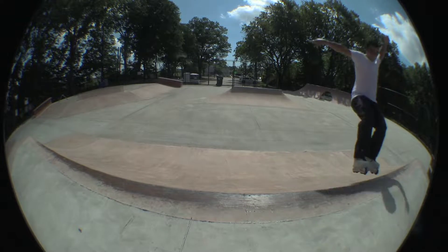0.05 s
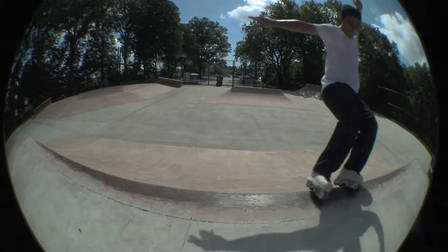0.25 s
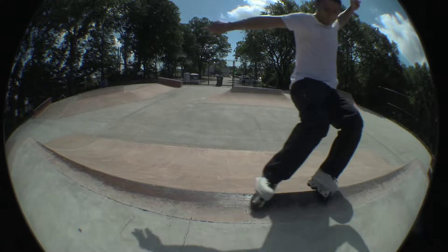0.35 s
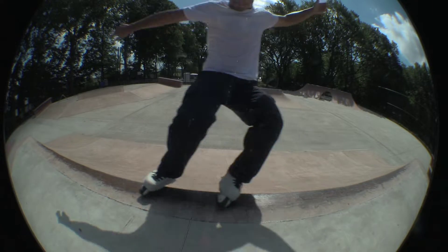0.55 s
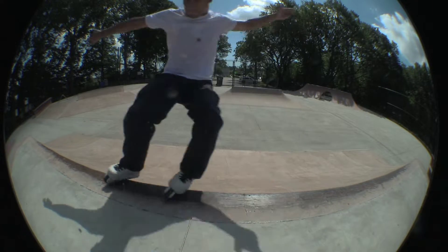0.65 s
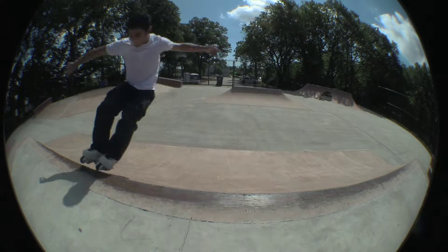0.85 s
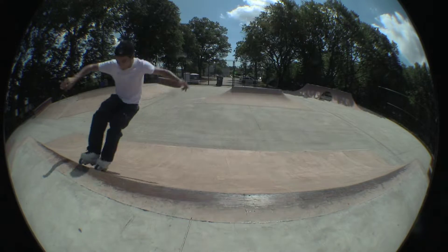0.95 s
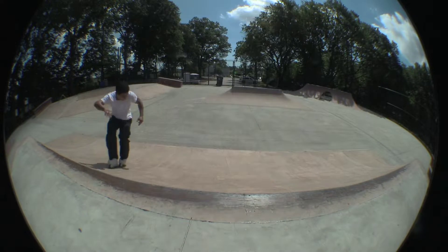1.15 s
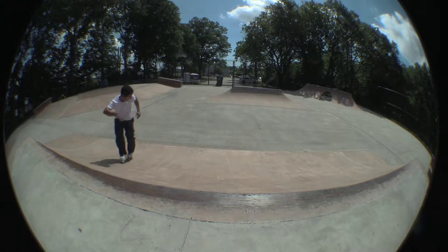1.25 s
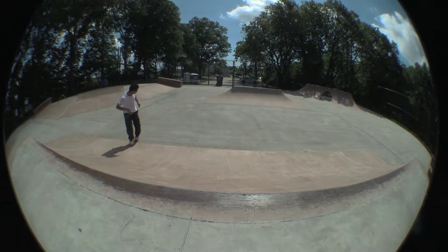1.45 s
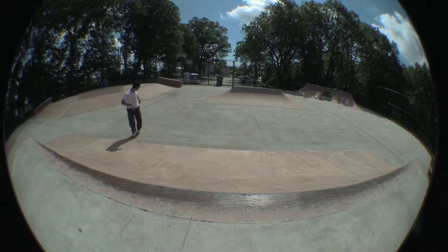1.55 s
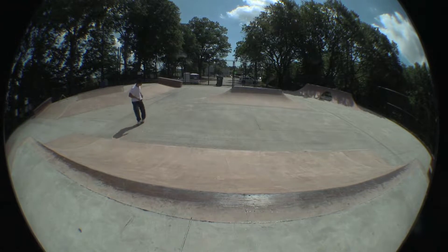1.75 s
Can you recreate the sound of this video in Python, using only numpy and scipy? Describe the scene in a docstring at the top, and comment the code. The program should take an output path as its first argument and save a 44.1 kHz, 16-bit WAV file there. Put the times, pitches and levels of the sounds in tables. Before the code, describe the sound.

A rough inline skate grind passes close by, right to left, plastic boots clacking and rasping on a concrete ledge outdoors. A thudding landing follows, then hard wheels roll off under a short rumble of wind on the microphone.

```python
"""In an open park, an inline skater hops onto a concrete ledge and grinds along it from right to left.
The plastic boots knock on, stick and slip over the grit close to the microphone, and drop off with a
thump after a faint squeak. Hard wheels roar and drone, rolling away over a joint in the concrete.
The air stirred by the skater buffets the microphone; the park adds a faint wash and hardly any echo."""
import sys
import numpy as np
from scipy import signal
from scipy.io import wavfile
from scipy.ndimage import uniform_filter1d, minimum_filter1d, map_coordinates

SR = 44100
rng = np.random.default_rng(int(sys.argv[2]) if len(sys.argv) > 2 else 0)


def to_wav(s):
    """Save 16-bit WAV."""
    ch = np.atleast_2d(s).T  # columns
    pcm = np.round(np.clip(ch, -1, 1) * 32767)  # PCM
    wavfile.write(sys.argv[1], SR, pcm.astype(np.int16))


N = 79380
T = np.arange(N) / SR

# Tone of the grind's low rumble, hollow middle and sharp grit: f/Hz, level/dB
RUMBLE_TONE = [(40, -59), (90, -19.5), (140, -4), (205, 4), (280, -0.5), (370, -7.5), (600, -49),
               (1500, -66)]
HOLLOW_TONE = [(150, -45.5), (300, -11), (400, 2.5), (540, 0.5), (690, 5.5), (880, -3.5), (1300, -28),
               (3000, -51)]
GRIT_TONE = [(1500, -32.5), (3200, -4.5), (4200, 9), (5500, 4.5), (7500, -2), (9300, -2.5), (11500, -10),
             (14500, -18), (16000, -30)]
# How loud each part of the grind is: t/s, rumble/dB, hollow/dB, rasp/dB, grit/dB
GRIND_LEVELS = [(.24, -19.5, -41, -62, -53), (.258, -21, -23.5, -32, -32), (.275, -8.5, -25, -13, -25),
                (.312, -36.5, -27.5, -22.5, -35), (.345, -14, -37, -20.5, -35),
                (.368, -28.5, -27.5, -22.5, -36), (.402, -17.5, -26.5, -26.5, -37),
                (.415, -23, -25.5, -17.5, -31.5), (.50, -18.5, -21.5, -19, -35.5),
                (.548, -17, -22.5, -13, -31), (.57, -26.5, -25.5, -17.5, -38), (.595, -27, -22, -18, -36.5),
                (.615, -22.5, -22.5, -16.5, -35), (.665, -28.5, -18, -16, -36),
                (.70, -16.5, -15.5, -15, -34), (.74, -28.5, -20, -20, -38), (.80, -20, -25, -25.5, -39),
                (.828, -19, -19, -19, -38), (.86, -25, -23, -20, -37), (.897, -63, -22, -20.5, -33.5),
                (.912, -27, -52, -46, -62)]


def grind(chatter_hz=135, chatter_db=2, fade_s=0.0072):
    """The soles stick and slip along the ledge; this one chatter drives all four parts of the sound."""
    slips = unit(filtered(noise(), 2, chatter_hz))
    chatter = grains(spread_db=3) * amp(chatter_db * slips)
    surge = amp(catches_db())
    start, end = GRIND_LEVELS[0][0], GRIND_LEVELS[-1][0]
    contact = np.clip(np.minimum(T - start, end - T) / fade_s + 1, 0, 1)
    parts = [colour(chatter, RUMBLE_TONE), colour(chatter, HOLLOW_TONE),
             boot(chatter), colour(chatter, GRIT_TONE)]
    rumble, hollow, rasp, grit = [steady(part) * amp(curve(GRIND_LEVELS, column))
                                  for column, part in enumerate(parts, 1)]
    return contact * ((rumble + hollow) * surge ** 0.25 + (rasp + grit) * surge)


# Rough spots on the ledge: t/s, boost of rasp and grit/dB
ROUGH_SPOTS = [(.4625, 4.5), (0.4717, 5), (0.477, 5.5), (0.5118, 4), (.532, 3.5), (0.5516, 4), (.577, 2.5),
               (0.6057, 19), (0.6262, 5), (.6415, 3), (0.6491, 14), (.6615, 7), (0.692, 10), (0.7242, 10.5),
               (0.751, 6.5), (0.784, 11), (.819, 14), (.8385, 6), (.867, 2.5)]


def catches_db(grip_s=0.0017, release_s=0.0031):
    """The sole grips each rough spot at once and lets go more slowly, so the grind surges."""
    boost_db = 0
    for s, db in ROUGH_SPOTS:
        before, after = np.maximum(s + grip_s - T, 0), np.maximum(T - s - grip_s, 0)
        boost_db += db * np.exp(-before / grip_s - (after / release_s) ** 2 / 2)
    return boost_db


# Notes the boot rings at: f/Hz, level/dB, time to fade by 60 dB/s
BOOT_NOTES = [(1122, -8, 0.031), (1260, -30, 0.064), (1370, -5, 0.093), (1512, -9, 0.027),
              (1950, -37, 0.082), (1980, -20, 0.083), (2396, -8, 0.031)]
# Tone of the boot's rasp: f/Hz, level/dB
RASP_TONE = [(400, -35), (850, -6), (1130, -1), (1500, -0.5), (1950, -3), (2500, -7), (3100, -12),
             (4200, -18.5), (6000, -61.5), (16000, -112)]
# The rasp is brightest when the soles face the microphone: t/s, treble level/dB
BOOT_TREBLE = [(.22, 13), (.297, -5), (.335, 0), (.47, 4.5), (.57, -5), (.63, -1.5), (.69, -3.5),
               (.76, -1.5), (.83, 1.5), (.89, -9.5), (1.05, -0.5), (1.55, -3)]


def boot(shaking, treble_hz=1960):
    """The shaken plastic boot rings briefly; its treble depends on which way it faces."""
    t = T[:SR // 8]
    ring = sum(amp(db - 60 * t / fade_s) * np.cos(2 * np.pi * hz * t) * 4 * np.log(1000) / (fade_s * SR)
               for hz, db, fade_s in BOOT_NOTES)
    rasp = colour(shaking + signal.fftconvolve(shaking, ring)[:N], RASP_TONE)
    dull = below(rasp, treble_hz)
    return dull + (rasp - dull) * amp(curve(BOOT_TREBLE))


# Notes the wheel frame rings at when hit: f/Hz, level/dB, decay/s
FRAME_NOTES = [(399, 2.5, 0.0047), (770, -1.5, 0.0039)]
# Blows on boots and wheels: t/s, thump f/Hz, thump/dB, hollow knock/dB, clack/dB, grit/dB
BLOWS = [(.224, 152, -5.5, -28.5, -23.5, -30.5), (0.2366, 165, -26, -37, -12, -21),
         (0.2588, 162, -13, -18, -13.5, -21), (0.265, 174, -4.5, -26, -15, -39),
         (.295, 203, -23, -28, -12, -24), (.3315, 194, -4, -18.5, -26, -36),
         (.409, 230, -11.5, -21.5, -10, -40), (.898, 265, -11.5, -33, -11.5, -37),
         (0.9169, 200, -37, -25.5, -17, -28.5), (0.9203, 194, -9, -26, -23.5, -51),
         (1.0094, 192, -17, -29, -22.5, -35), (1.022, 217, -22, -28, -27, -35),
         (1.039, 218, -0.5, -14, -17, -30), (1.0496, 240, -4, -21.5, -15.5, -32),
         (1.07, 275, -2, -7.5, -18, -30), (1.5459, 333, -23, -36.5, -23, -37),
         (1.5908, 293, -20.5, -27, -25, -42), (1.603, 330, -12.5, -32, -24.5, -49)]


def knocks(overtone_ratio=1.88):
    """Each blow makes the skate thump, with a hollow knock, a plastic clack and a spit of grit."""
    thumps, cracks = np.zeros((2, N))
    for s, hz, thump_db, hollow_db, clack_db, grit_db in BLOWS:
        t = np.maximum(T - s, 0)
        rise = 1 - np.exp(-t / 0.0014)
        low = fading_note(t, hz, decay_s=0.0029)
        overtone = amp(-6) * fading_note(t, hz * overtone_ratio, decay_s=0.0017)
        thumps += 2 * amp(thump_db) * rise * (low + overtone)
        frame = sum(amp(db) * fading_note(t, note_hz, decay_s) for note_hz, db, decay_s in FRAME_NOTES)
        thumps += amp(hollow_db) * (burst(colour(noise(), HOLLOW_TONE), s, decay_s=0.0051) + frame)
        cracks += amp(clack_db) * burst(boot(noise()), s, decay_s=0.0059)
        cracks += amp(grit_db) * burst(colour(noise(), GRIT_TONE), s, decay_s=0.0076)
    return filtered(thumps, order=3, hz=111, kind="high") + cracks


# How loud the rolling wheels are: t/s, drone/dB, roar/dB
WHEEL_LEVELS = [(0, -41, -40), (.09, -40, -40), (.2, -41.5, -39), (.5, -44, -24), (.93, -35.5, -42),
                (.985, -39.5, -38.5), (1.09, -28.5, -35.5), (1.17, -38.5, -34), (1.27, -32, -33.5),
                (1.41, -38.5, -32.5), (1.535, -41.5, -37), (1.562, -36, -29), (1.6, -29, -37),
                (1.63, -37, -36.5), (1.71, -43.5, -40.5), (1.8, -50.5, -40)]
# Tone of the wheels' roar: f/Hz, level/dB
ROAR_TONE = [(200, -49.5), (450, -5.5), (750, -3.5), (950, -3.5), (1350, -0.5), (1750, -4.5), (2400, -6),
             (3200, -14), (4500, -31), (6200, -27), (9500, -44), (13000, -44), (15500, -77)]


def wheel_roar():
    """Hard wheels rattle over fine concrete, sounding duller before the first knock."""
    bright = colour(grains(spread_db=4), ROAR_TONE)
    dull = filtered(bright, order=1, hz=1800)
    return steady(np.where(T < BLOWS[0][0], dull, bright)) * amp(curve(WHEEL_LEVELS, 2))


# Tone of the wheels' drone: f/Hz, level/dB
DRONE_TONE = [(20, -45), (70, -8.5), (130, -4), (210, 2.5), (350, -1), (550, -10), (1200, -42)]


def wheel_drone():
    """The rolling wheels and their frames give a low hum."""
    return steady(colour(grains(spread_db=4), DRONE_TONE)) * amp(curve(WHEEL_LEVELS, 1))


def squeak(start_s=0.981, length_s=0.026, top_hz=3460, bend=0.06):
    """A faint squeak in mid-air rises and falls in pitch, along with a note an octave higher."""
    arch = np.sin(np.pi * np.clip((T - start_s) / length_s, 0, 1))
    phase = 2 * np.pi * np.cumsum(top_hz * (1 - bend * (1 - arch) ** 2)) / SR
    return arch * (amp(-51) * np.sin(phase) + amp(-50) * np.sin(2 * phase))


# Where the skater is heard: t/s, head start on the left/ms, left minus right in the midrange/dB
SKATER_PATH = [(0, -0.18, -6.5), (.27, -0.18, -9.5), (.4, -.11, -2), (.5, -0.058, -4.5), (.6, -0.041, -1),
               (.7, 0.063, 1.5), (.8, .11, 2), (.9, .135, 4), (1.07, 0.2, 6), (1.3, 0.085, 5.5),
               (1.6, 0.11, -2.5), (1.8, 0.011, -3)]


def pass_by(sound, bass_hz=750, treble_hz=6170, bass_balance_db=-1.4):
    """The nearer side hears the skater sooner and louder; the bass stays a little to the right."""
    lead_samples = curve(SKATER_PATH, 1) * SR / 1000
    balance_db = curve(SKATER_PATH, 2)
    bass = below(sound, bass_hz)
    body = below(below(sound, treble_hz), treble_hz)
    channels = []
    for side in (0.5, -0.5):  # left, right
        shaded = bass * amp(side * bass_balance_db) + (body - bass) * amp(side * balance_db)
        shifted = map_coordinates(shaded, [np.arange(N) + side * lead_samples], order=5)
        treble = (sound - body) * amp(side * balance_db / 2)  # stays nearer the centre
        channels.append(shifted + treble)
    return np.array(channels)


# Tone of wind on the microphone: f/Hz, level/dB
WIND_TONE = [(15, -14), (35, -23), (62, -8), (105, 0), (170, 0), (300, -46), (900, -76)]
# Strength of the swirling air, and of single puffs: t/s, level/dB
SWIRL_LEVELS = [(0, -49), (.09, -40), (.2, -50), (.3, -51), (1.12, -49), (1.165, -29), (1.2, -28.5),
                (1.24, -27.5), (1.3, -26.5), (1.34, -34), (1.39, -22), (1.45, -33), (1.49, -76), (1.8, -88)]
PUFFS = [(1.198, -38), (1.385, -14), (1.395, -14), (1.4039, -16.5), (1.4346, -20)]


def skater_wind(left_db=-4, right_db=2, puff_s=0.00149):
    """Swirls of air hit each side of the microphone, the right one harder, with a few sharp puffs."""
    swirls = np.array([steady(colour(noise(), WIND_TONE)) for _ in range(2)]) * amp(curve(SWIRL_LEVELS))
    puffs = np.zeros(N)
    for s, db in PUFFS:
        offset = (T - s) / puff_s
        puffs += amp(db) * (1 - offset ** 2) * np.exp(-offset ** 2 / 2)
    return (swirls + puffs) * amp([[left_db], [right_db]])


# Tone of sound bouncing off nearby concrete: f/Hz, level/dB
BOUNCE_TONE = [(100, -21), (500, -16.5), (1400, -11.5), (2800, -8.5), (4500, -5), (7000, -4.5),
               (15000, -14)]


def ground_bounces(sound, change_s=0.045, decay_s=0.0034):
    """Sound bounces off the ground and ledge in a pattern that keeps changing as the skater moves."""
    t, hop = T[:SR // 32], int(change_s * SR)
    padded = np.pad(sound, (hop, 2 * hop))
    bounced = np.zeros(N + 3 * hop + len(t))
    for at in range(0, N + hop, hop):
        echoes = rng.standard_normal(len(t)) * np.exp(-t / decay_s)
        piece = padded[at:at + 2 * hop] * signal.windows.cosine(2 * hop)
        echoed = signal.fftconvolve(piece, echoes / np.linalg.norm(echoes))
        bounced[at:at + len(echoed)] += echoed
    return signal.fftconvolve(bounced[hop:], response(BOUNCE_TONE))[:N]


# How long the park's echo lasts: f/Hz, time to fade by 60 dB/s
ECHO_TIMES = [(100, 0.054), (1500, .3), (5000, 0.23), (15000, 0.13)]


def park_echo(sound, tail_db=-30.5):
    """The open park returns the nearby bounces, then only a thin tail of echo."""
    hz, t, spectrum = signal.stft(rng.standard_normal(SR // 2), SR, nperseg=256)
    fade = amp(-60 * t / read(ECHO_TIMES, hz)[:, None])
    tail = signal.istft(spectrum * fade, SR)[1]
    tail *= amp(tail_db) / np.linalg.norm(tail)
    return ground_bounces(sound) + signal.fftconvolve(sound, tail)[:N]


# Tone of the park's background: f/Hz, level/dB
WASH_TONE = [(25, -21), (120, -31), (500, -22), (1300, -13), (2500, -0.5), (4500, -4.5), (9000, -24),
             (12000, -52), (15500, -66)]


def park_wash():
    """A faint, even wash of noise from the open park."""
    return amp(-51) * colour(noise(), WASH_TONE)


# Tone of the microphone's hiss: f/Hz, level/dB
HISS_TONE = [(3000, -36), (6500, -14), (7400, 2.5), (8100, 7), (9000, -1), (11000, -6), (13000, -32),
             (15500, -32)]


def microphone_hiss():
    """The microphone adds a thin, high hiss of its own."""
    return amp(-56) * colour(noise(), HISS_TONE)


def grains(spread_db, per_s=5000):
    """Tiny collisions with the concrete, a few of them large."""
    hits = (rng.random(N) < per_s / SR) * np.sign(noise())
    return hits * amp(spread_db * np.minimum(rng.exponential(1, N), 4))


def burst(x, start_s, decay_s, rise_s=0.00033):
    """Cuts noise into a short crunch that jumps up and dies away."""
    t = np.maximum(T - start_s, 0)
    envelope = (1 - np.exp(-t / rise_s)) * np.exp(-t / decay_s)
    return unit(x * envelope) * np.sqrt(np.mean(envelope ** 2))


def fading_note(t, hz, decay_s):
    """A pure note that dies away."""
    return np.sin(2 * np.pi * hz * t) * np.exp(-t / decay_s)


def noise():
    """White noise: an even hiss."""
    return rng.standard_normal(N)


def amp(db):
    """Turns decibels into a multiplier."""
    return 10 ** (np.asarray(db) / 20)


def unit(x):
    """Scales a sound to an average power of 1."""
    return x / np.sqrt(np.mean(x ** 2) + 1e-20)


def steady(x, smooth_s=0.055):
    """Evens out slow swells and keeps the fine grain."""
    window = signal.windows.hann(int(2 * smooth_s * SR))
    power = abs(signal.fftconvolve(x ** 2, window / window.sum(), "same"))
    return x / np.sqrt(power + 1e-12)


def curve(table, column=1):
    """One column of a timed table, at every sample."""
    rows = np.array(table)
    return np.interp(T, rows[:, 0], rows[:, column])


def read(table, hz):
    """Looks up a frequency table, gliding between its rows on a pitch scale."""
    f, value = np.transpose(table)
    return np.interp(np.log(hz + 1), np.log(f), value)


def response(tone, size=4096):
    """What a single click becomes after a filter with this tone."""
    log_gain = np.log(amp(read(tone, abs(np.fft.fftfreq(size, 1 / SR)))))
    return np.fft.ifft(np.exp(np.conj(signal.hilbert(log_gain)))).real[:size // 2]


def colour(x, tone):
    """Gives white noise a tone and keeps its power."""
    click = response(tone)
    return signal.fftconvolve(x, click / np.linalg.norm(click))[:N]


def filtered(x, order, hz, kind="low"):
    """Keeps the low or high side of hz; a higher order cuts more steeply."""
    return signal.sosfilt(signal.butter(order, hz, kind, fs=SR, output="sos"), x)


def below(x, hz):
    """The part of x under hz, without delay."""
    return signal.sosfiltfilt(signal.butter(2, hz, fs=SR, output="sos"), x)


def scene(scattered_roar=0.66):
    """The moving skater, the park around, wind and microphone hiss."""
    skater = grind() + knocks() + wheel_roar() + wheel_drone() + squeak()
    around = np.array([park_echo(skater) + scattered_roar * wheel_roar() + park_wash() for _ in range(2)])
    return pass_by(skater) + around + skater_wind() + microphone_hiss()


def record(dry, ceiling=0.93, react_s=0.004, top_hz=15700):
    """Turns the loudest peaks down for a moment, then cuts the very highest treble."""
    size = int(react_s * SR)
    needed_gain = ceiling / np.maximum(abs(dry).max(0), ceiling)
    gain = uniform_filter1d(minimum_filter1d(needed_gain, size), size)
    treble_cut = signal.firwin(511, top_hz, window=("kaiser", 9), fs=SR)
    return signal.oaconvolve(dry * gain, treble_cut[None], "same")


dry = scene()
out = record(dry)
to_wav(out)
```